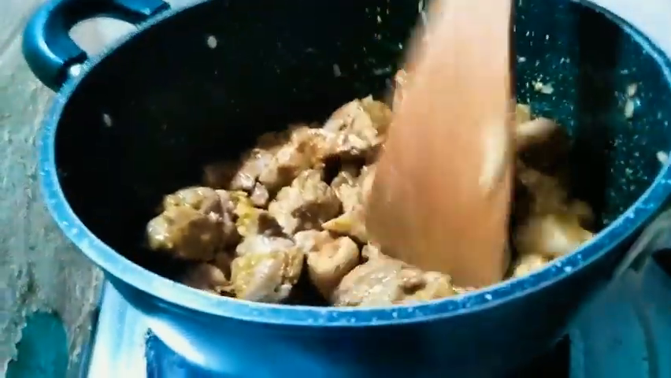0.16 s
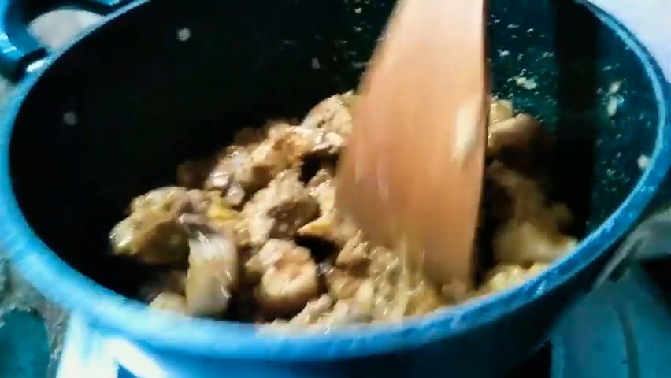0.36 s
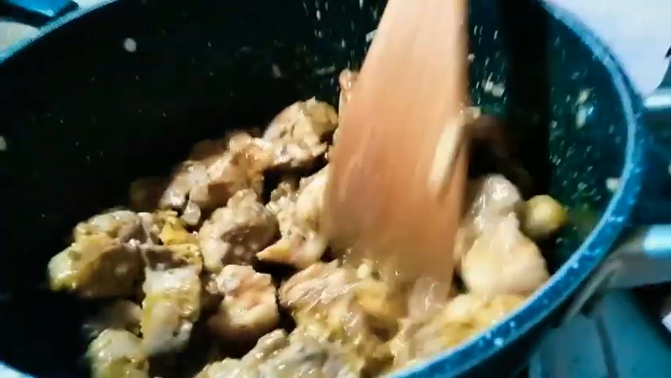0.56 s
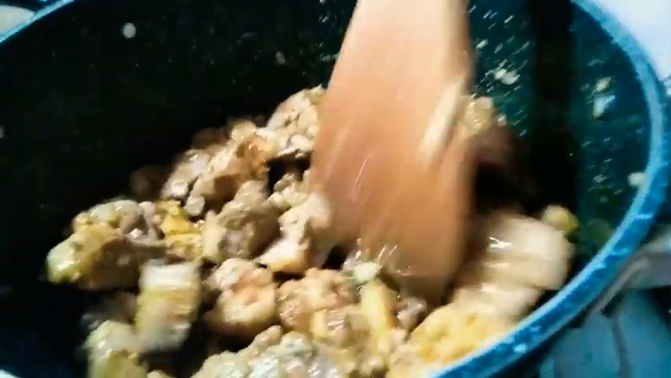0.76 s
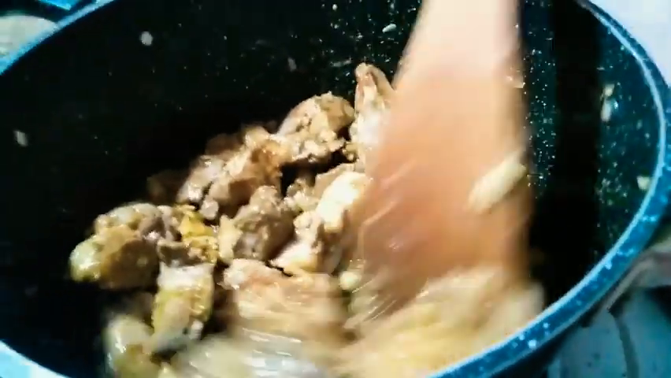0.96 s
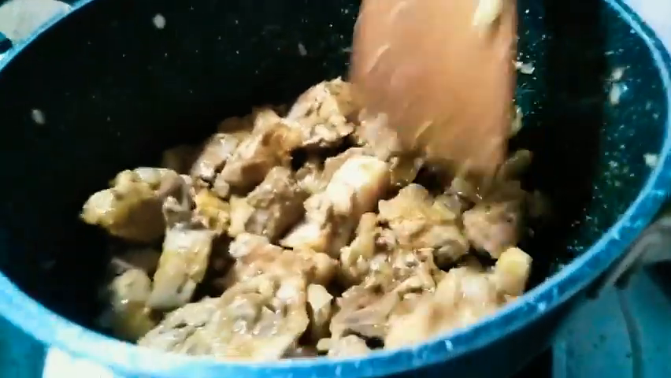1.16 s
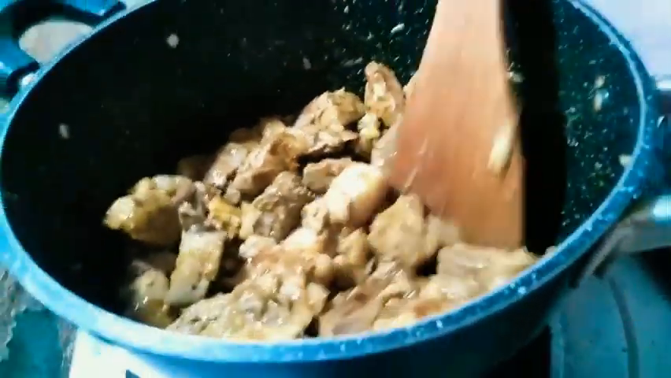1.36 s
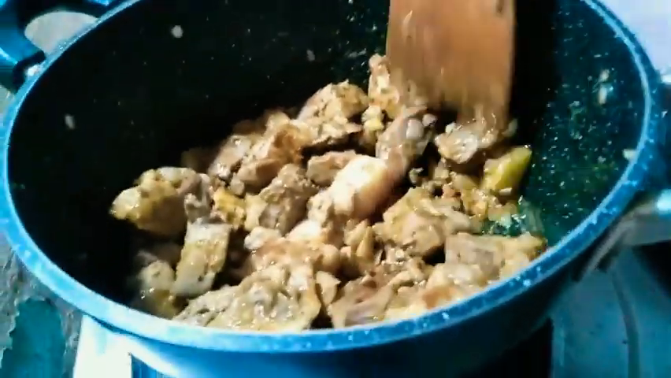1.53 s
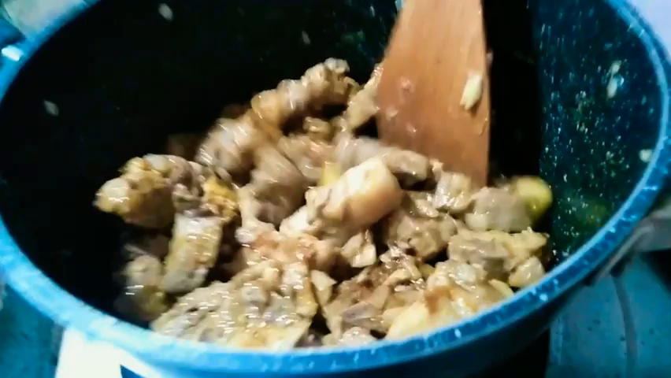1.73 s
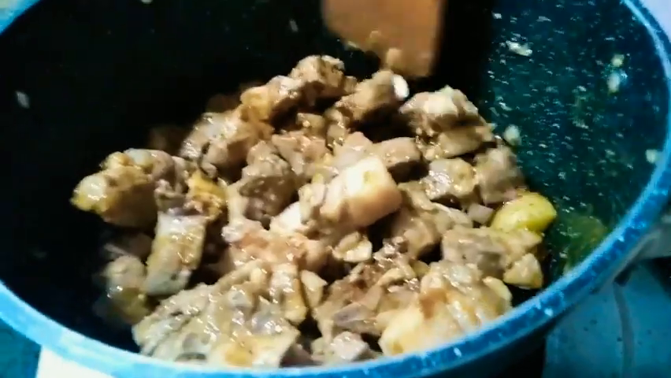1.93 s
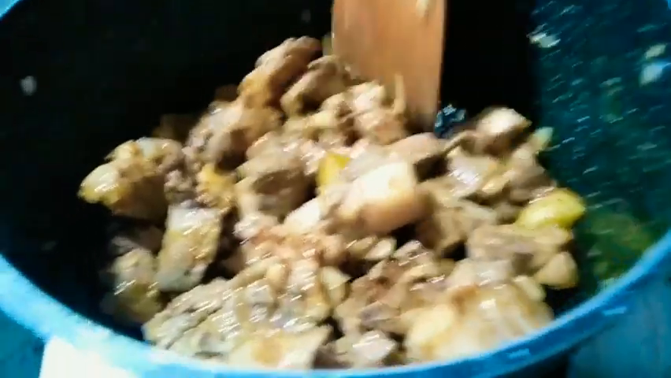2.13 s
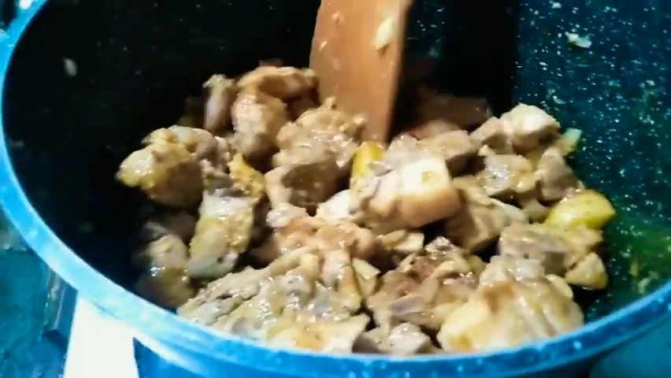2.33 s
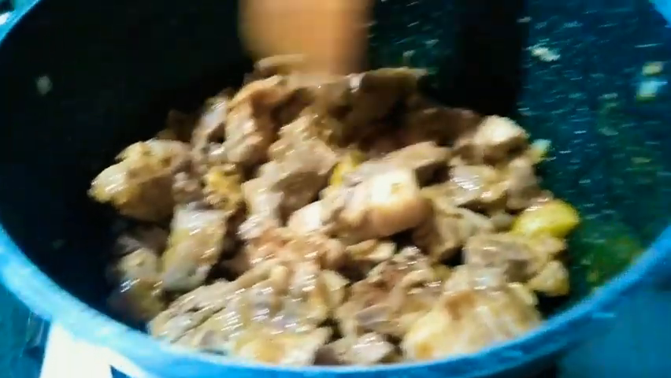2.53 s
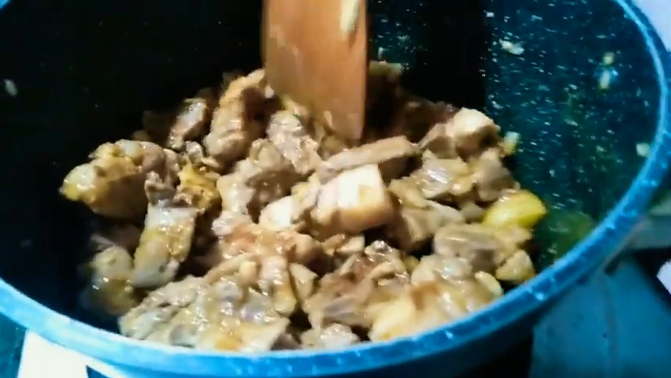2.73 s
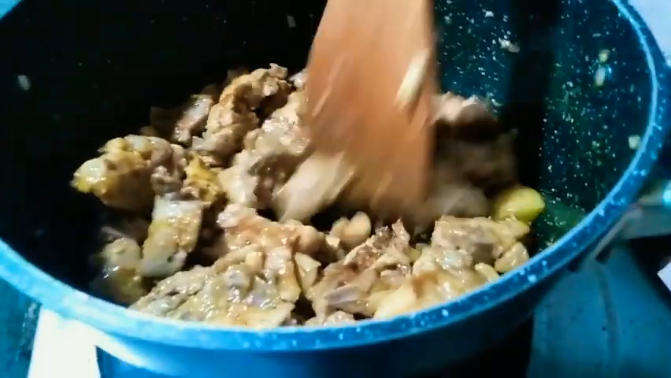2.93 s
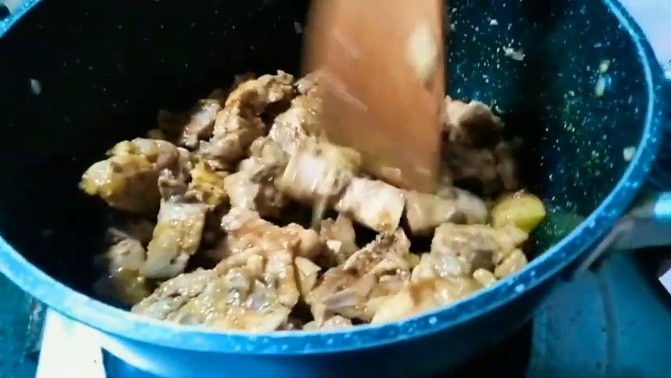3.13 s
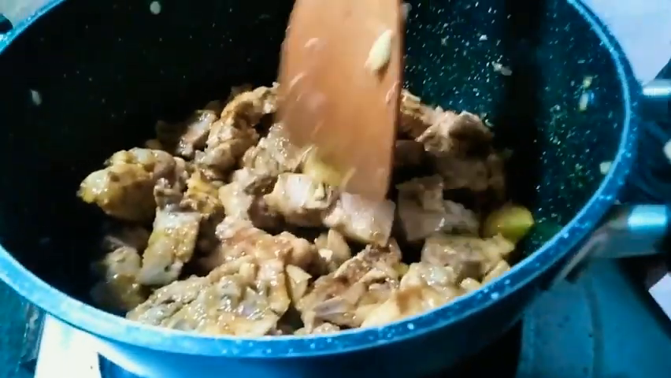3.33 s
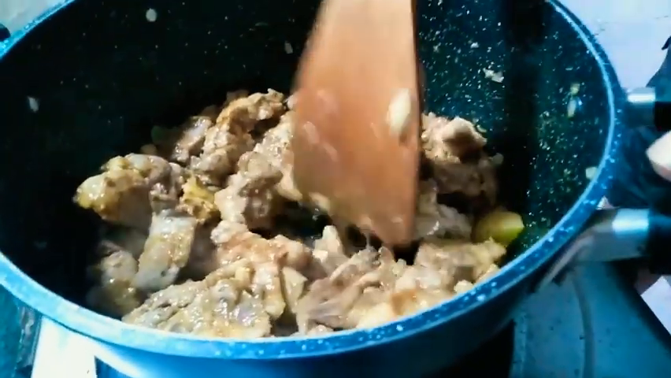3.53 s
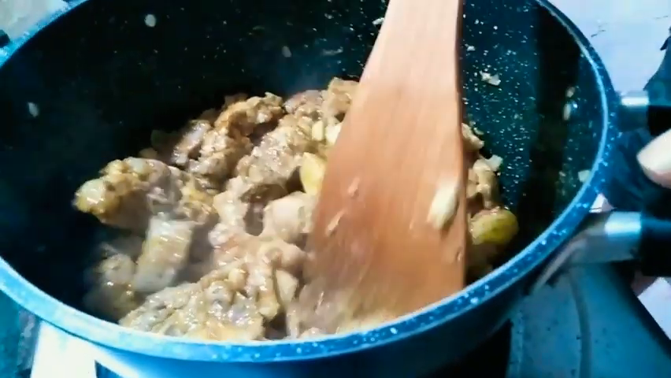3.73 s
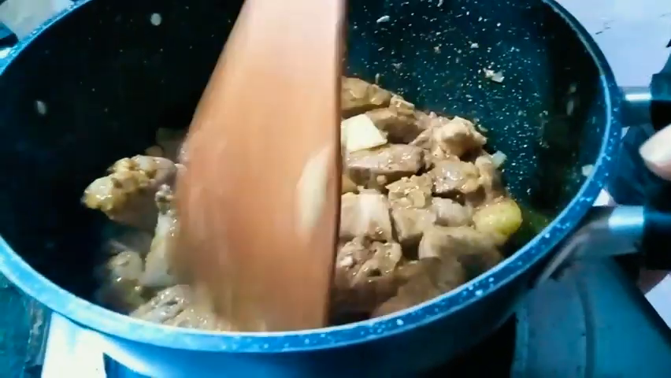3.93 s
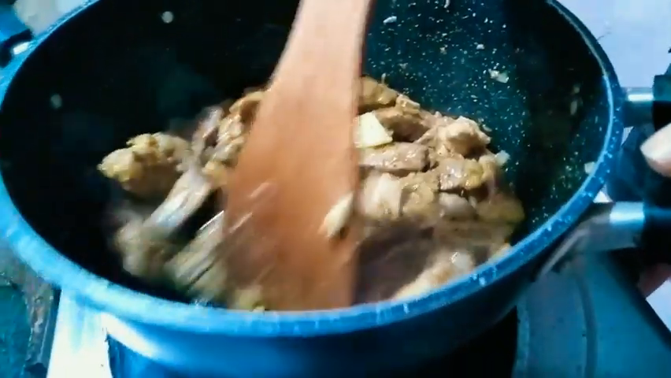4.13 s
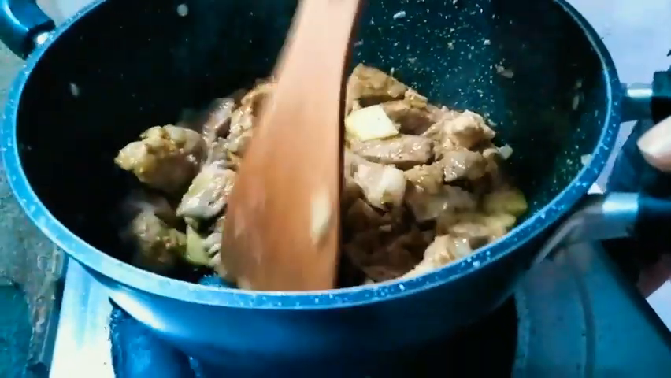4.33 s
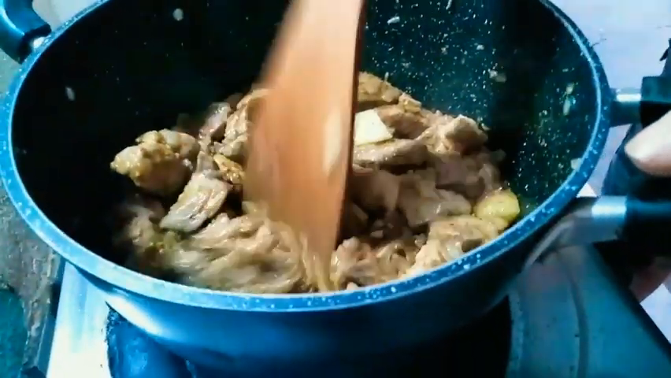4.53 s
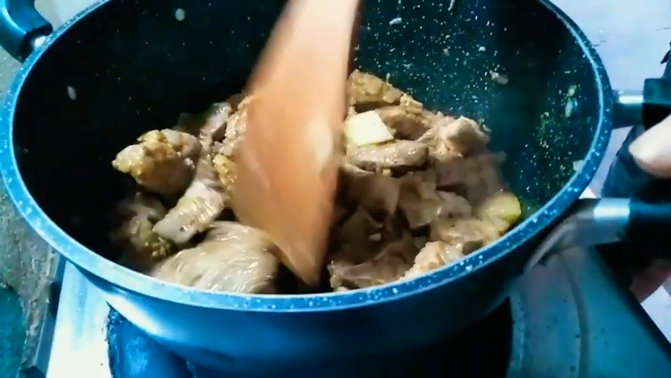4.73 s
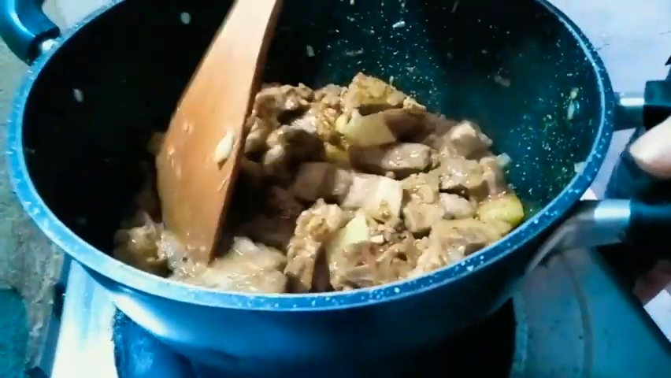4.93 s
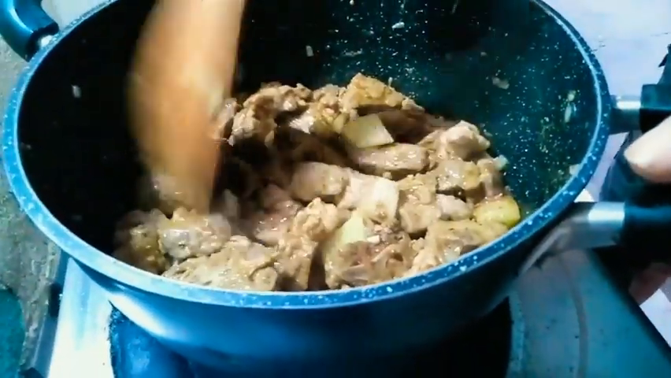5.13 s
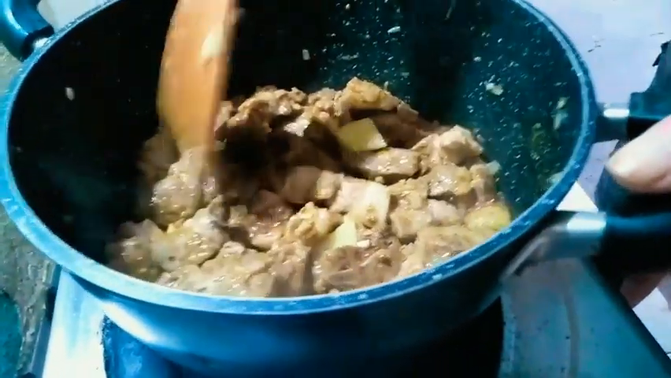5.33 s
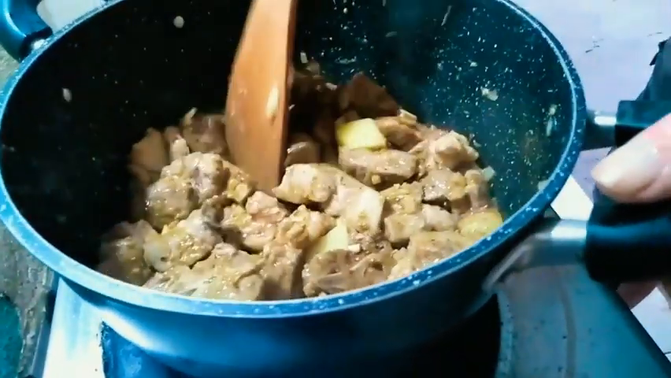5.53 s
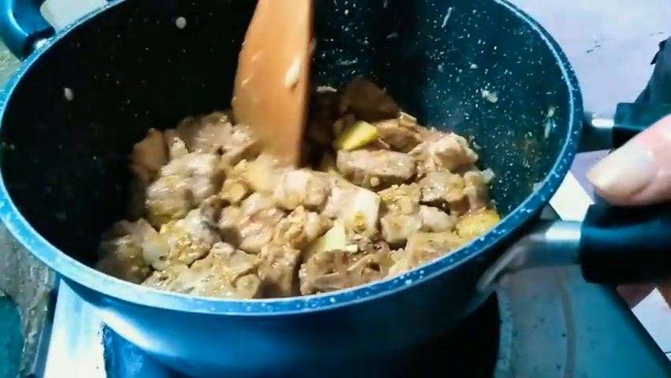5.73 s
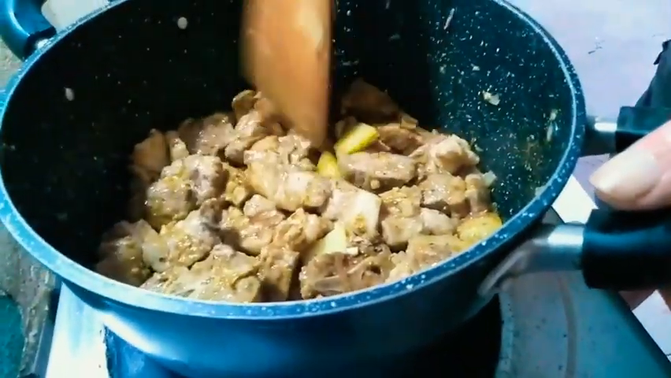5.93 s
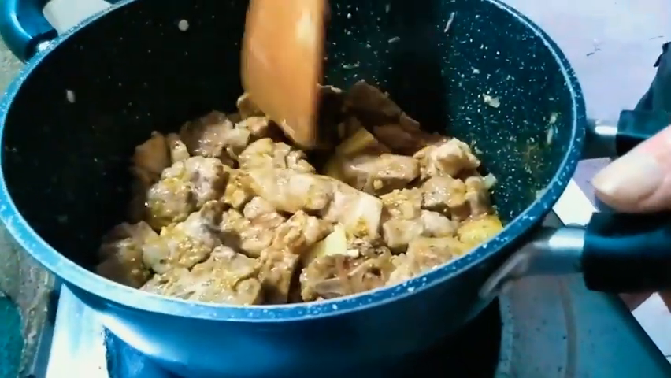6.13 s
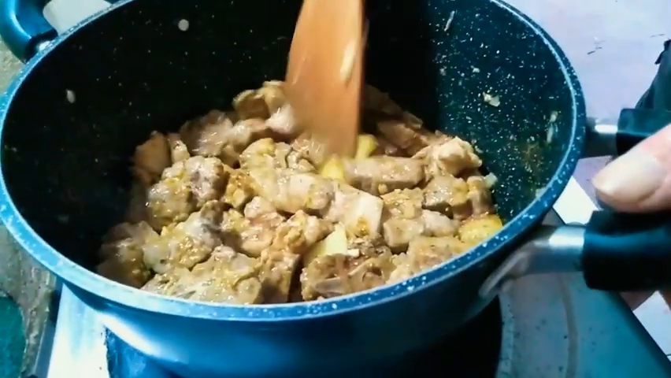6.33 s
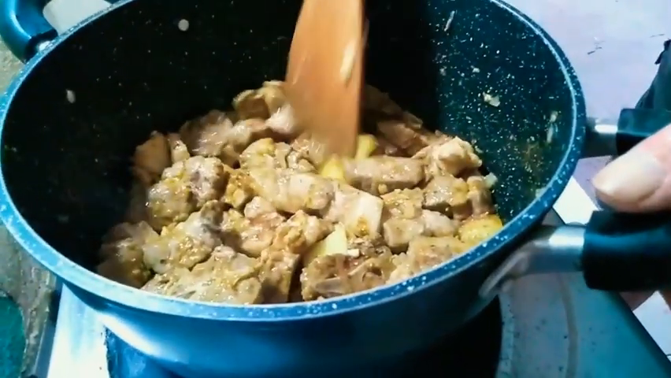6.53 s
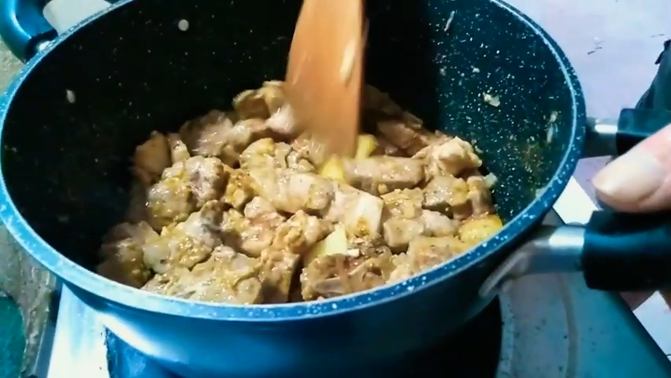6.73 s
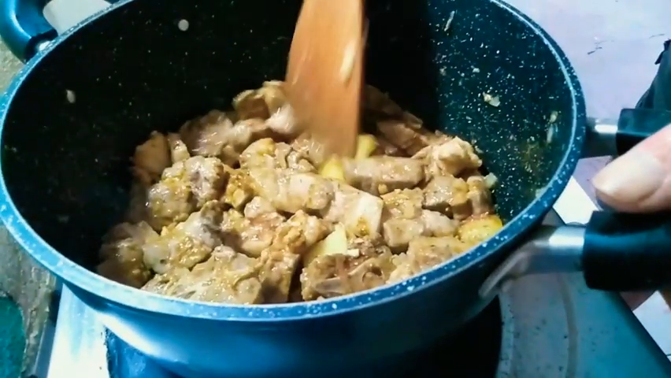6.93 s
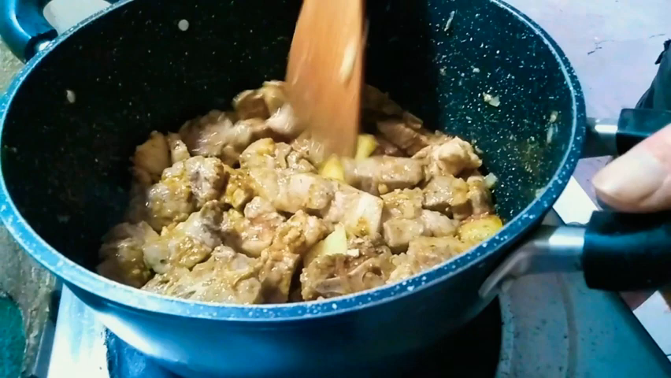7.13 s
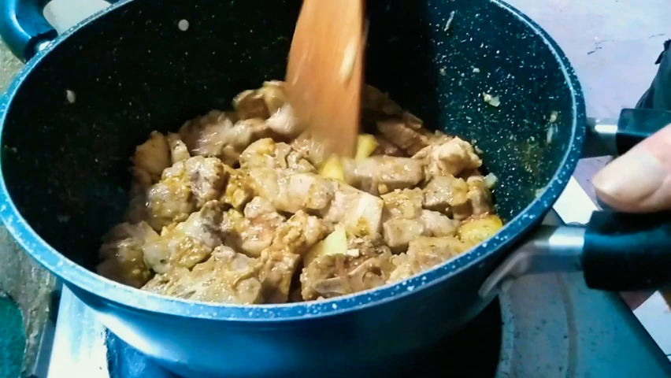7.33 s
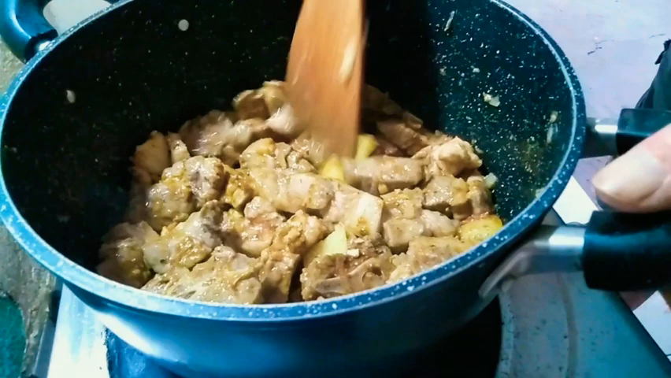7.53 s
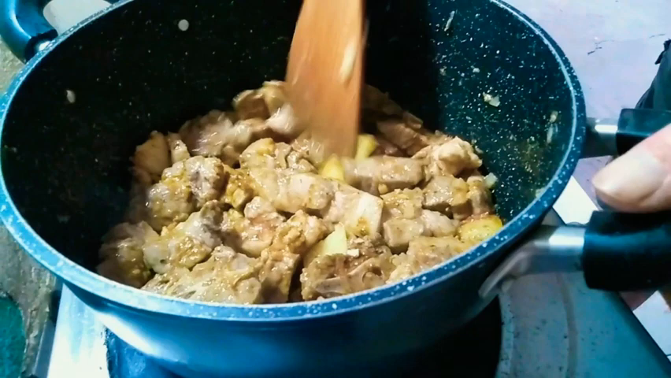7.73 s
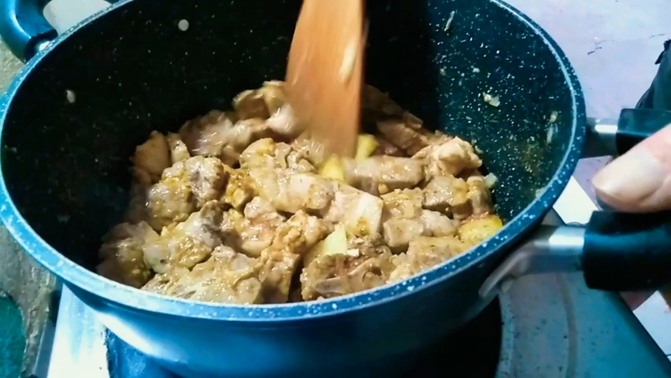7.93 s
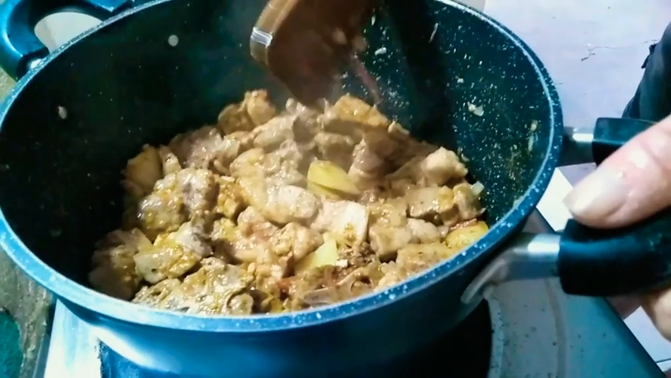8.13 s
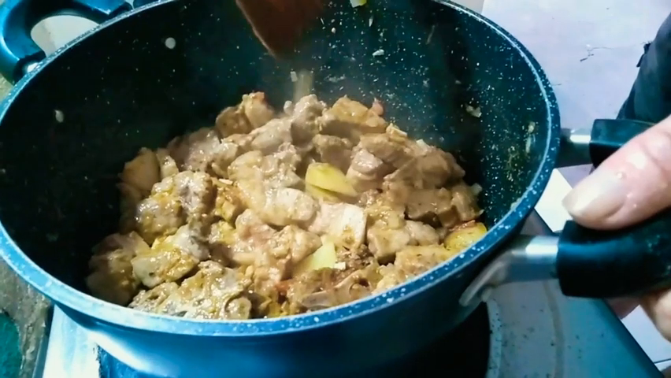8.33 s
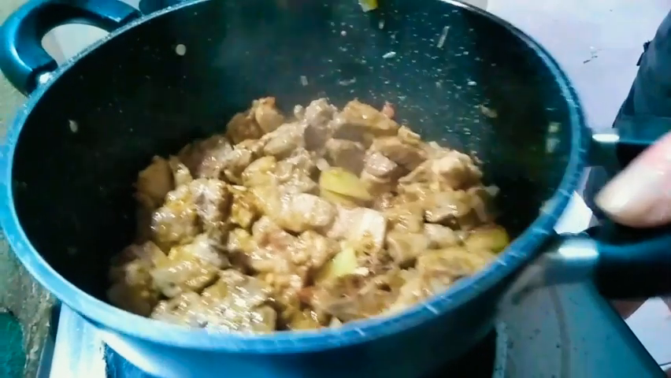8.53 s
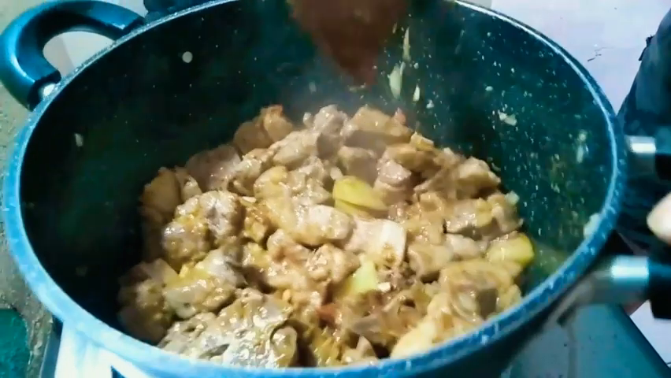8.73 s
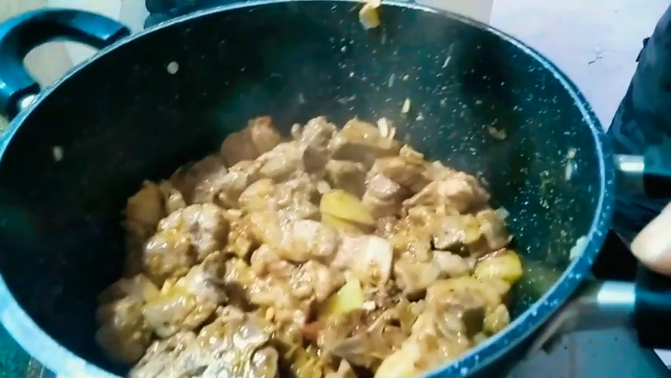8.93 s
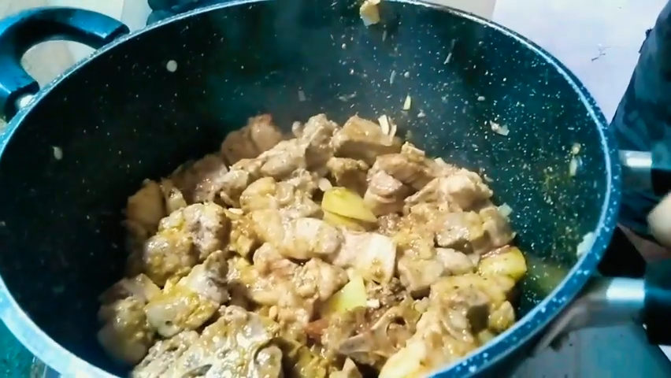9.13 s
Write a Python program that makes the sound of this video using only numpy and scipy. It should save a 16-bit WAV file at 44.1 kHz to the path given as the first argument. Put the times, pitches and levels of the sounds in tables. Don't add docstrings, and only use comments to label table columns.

```python
import sys
import numpy as np
from scipy import signal
from scipy.fft import rfft, irfft, next_fast_len
from scipy.io import wavfile
from scipy.ndimage import uniform_filter1d

SR = 44100
rng = np.random.default_rng(int(sys.argv[2]) if len(sys.argv) > 2 else 0)


def makeup_ratio(level_db):
    decades = np.asarray(level_db, float) / 20
    return 10 ** decades


def bounce(signal):
    frames = np.transpose(np.atleast_2d(signal))
    limited = np.clip(frames, -1, 1)
    pcm = np.round(limited * 32767).astype(np.int16)
    wavfile.write(sys.argv[1], SR, pcm)


N = 408366

# (frequency [Hz], density [dB per Hz])
SPRAY_SPECTRUM = [(900, -8), (1940, 1), (3400, -6), (4200, -5), (5350, -9), (6880, -5), (8130, 4),
                  (9850, -6), (11800, -9), (13400, -6), (14500, -2), (15750, 5)]
# (frequency [Hz], density [dB per Hz])
CRACKLE_SPECTRUM = [(600, -25.5), (865, 12.5), (1010, -6.5), (1150, 9.5), (1500, 3.5), (1950, 8),
                    (2300, 4.5), (2700, 5.5), (3100, 3.5), (3600, -1), (4200, -4), (5000, -11.5)]
# (frequency [Hz], density [dB per Hz])
LOW_SPECTRUM = [(12, -54), (20, -2), (54, -6), (77, -14.5), (108, -22.5), (157, -9), (253, -22),
                (406, -12.5), (448, -13), (583, -7), (721, -8.5), (863, -19.5), (1000, -2), (1300, -50.5),
                (2200, -120)]
# (frequency [Hz], density [dB per Hz])
RIM_SPECTRUM = [(2500, -19), (3200, -15.5), (4350, -7.5), (5910, -12), (7560, -4), (8230, -0.5),
                (11400, -15), (14000, -15), (15700, -3.5)]

# (frequency [Hz], level [dB], decay t60 [s])
POT_MODES = [(148.6, -6.5, 0.84), (226, -1, 0.13), (350, 13.5, 0.083), (418.8, 2.5, 0.31), (488, 0, 0.22),
             (542.9, -3.5, 0.51), (608, 3, 0.23), (688, 14.5, 0.14), (806, 14, 0.16), (894, 7, 0.28)]
# (frequency [Hz], level [dB], decay t60 [s])
BLADE_MODES = [(1096, 6, 0.026), (1314, 3, 0.034), (1621, 13.5, 0.013), (1878, 14, 0.0092),
               (2150, -6, 0.12), (2440, 0, 0.031)]
# (frequency [Hz], decay t60 [s])
KITCHEN_DECAY = [(100, 0.033), (600, 0.19), (2000, 0.2), (8000, 0.034), (15000, 0.017)]
# (frequency [Hz], decay t60 [s])
SCATTER_DECAY = [(100, 0.17), (330, 0.45), (520, 0.34), (850, 0.48), (2000, 0.19), (3000, 0.23)]

# (time [s], level [dB])
HEAT = [
    (0, 2.5),
    (1.6, 0.5),
    (2.4, 1.1),
    (4.4, 1),
    (5.9, -1.3),
    (7.0, 0),
    (7.9, -1.2),
    (9.26, -2.5),
]
# (time [s], level [dB])
LEAN = [(0, 0.5), (.44, 2.5), (.74, 0.5), (1.03, 2), (1.75, 0), (3.8, 1.3), (4.18, 5), (4.8, 0), (5.44, 3),
        (5.8, -1.5), (6.6, 1), (6.8, 0), (7.17, 3.5), (8.0, -1.5), (8.2, 6.5), (8.46, 2), (8.85, 5.5),
        (9.26, -3.5)]
# (time [s], flare [dB])
STROKES = [(.25, 4.3), (.6, 4.5), (.99, 4.7), (1.29, 1.8), (1.66, 3), (2.07, 2.5), (2.33, 6.5), (2.64, 4.5),
           (2.97, 3), (3.19, 1.7), (3.49, 1.6), (3.75, 2.2), (4.09, 1.5), (4.61, 4), (4.93, 4), (5.2, 5),
           (5.47, 4), (5.72, 5.2), (6.03, 3.3), (6.26, 4), (6.53, 3.5), (6.88, 3.5), (7.18, 4), (7.42, 1),
           (9.0, 1.2)]
# (time [s], peak [dB])
SPITS = [(.057, -24), (.225, -36), (.582, -32), (1.28, -24), (1.61, -41), (1.828, -30), (2.053, -30),
         (2.2777, -41), (2.69, -33), (2.942, -37), (3.469, -28), (3.74, -30), (4.039, -25), (4.27, -29),
         (5.021, -29), (5.176, -28), (5.412, -24), (5.73, -34), (6.413, -24), (6.462, -25), (6.494, -27.5),
         (6.543, -23), (6.5924, -27), (6.706, -27), (6.866, -33), (7.1272, -38), (7.582, -36), (7.619, -25),
         (7.8, -27), (8.348, -34)]
# (time [s], peak [dB], thump [dB], body [Hz])
SHOVES = [(.47, -44, 0, 455), (1.295, -42, 3, 424), (1.335, -33.5, -12, 515), (1.369, -40, -17, 700),
          (4.02, -41.5, -9, 580), (4.088, -38, -1, 670), (4.169, -41, -3, 603), (4.21, -37.5, -7, 610),
          (7.624, -43, -12, 560)]
# (time [s], peak [dB], hardness [dB], thump [dB], body [Hz])
BOUNCES = [
    (1.022, -34, -9, -17, 1190),
    (8.346, -31, -8, -35, 1720),
    (8.505, -32.5, -23, -11, 330),
    (8.672, -29, -3, -20, 594),
    (8.738, -19, -4, -16, 790),
]
# (start [s], length [s], level [dB])
RUBS = [
    (1.288, 0.11, -48),
    (4.06, 0.28, -55),
    (5.404, 0.051, -49.5),
    (7.097, 0.074, -56),
    (8.79, 0.16, -50.5),
    (8.46, .08, -48),
]
# (time [s], peak [dB], hardness [dB], ring factor [ratio], body [Hz])
STABS = [
    (1.683, -10, -1.5, 0.68, 553),
    (3.468, -16, -9, 0.57, 537),
    (4.618, -20.5, -19, 0.67, 504),
    (5.472, -18.5, -14, .65, 593),
]
# (time [s], peak [dB], body [Hz])
TICKS = [(2.064, -30.5, 710), (2.315, -33, 704), (2.635, -40, 690), (2.9, -31.5, 710), (3.728, -30.5, 670),
         (4.912, -34.5, 700), (5.409, -37, 690), (7.126, -33, 570), (7.17, -38, 616), (7.38, -30, 453)]
# (time [s], peak [dB])
RAPS = [
    (8.115, -11),
    (8.39, -10),
    (8.69, -9.3),
]
# (time [s], peak [dB])
SETTLES = [
    (8.799, -38),
    (8.879, -44),
]
# (time [s], low edge [Hz], high edge [Hz])
CHANNEL_SPLITS = [(1.99, 4200, 5300), (1.99, 13600, 15800), (2.18, 10300, 12500), (4.33, 5000, 7000),
                  (4.33, 12400, 14600), (4.54, 9600, 11100), (4.73, 5600, 8400), (5.94, 7500, 9800),
                  (7.31, 5000, 6400), (7.31, 10300, 11800), (8.395, 4200, 15800), (8.7, 4700, 15800)]

RUMBLE_DB, FIZZ_DB, CRACKLE_DB, SLOSH_DB, ROCK_DB = -57.5, -37.5, -47, -55.5, -61.5
SPLIT_HZ = 4700
FLARE_S = 0.048
SPIT_S = 0.013
DUCK_FROM_DB, DUCK_SHARE, RECOVER_DB_PER_S = -37.5, 0.26, 50
EDGE_HZ = 15770


def evened(x):
    return x / np.sqrt(np.mean(x ** 2) + 1e-20)


def read(points, hz):
    f, value = np.transpose(points)
    return np.interp(np.log(hz + 1), np.log(f + 1), value)


def add(mix, s, sound):
    part = mix[round(s * SR):][:len(sound)]
    part += sound[:len(part)]


def coloured(x, points, lo_hz=0, hi_hz=SR):
    hz = abs(np.fft.fftfreq(8192, 1 / SR))
    cut = 1 / np.sqrt((1 + (lo_hz / (hz + 1)) ** 8) * (1 + (hz / hi_hz) ** 8))
    log_gain = np.log(makeup_ratio(read(points, hz)) * cut + 1e-5)
    taps = np.fft.ifft(np.exp(np.conj(signal.hilbert(log_gain)))).real[:4096]
    return signal.oaconvolve(x, taps)[:len(x)]


def wander(top_hz):
    z = rfft(rng.standard_normal(next_fast_len(N)))
    hz = np.arange(len(z)) * SR / 2 / len(z)
    return evened(irfft(z * (hz > 1) / (1 + (hz / top_hz) ** 2))[:N])


def rumble():
    noise = evened(coloured(rng.standard_normal(N), LOW_SPECTRUM, lo_hz=30.2, hi_hz=105))
    return makeup_ratio(RUMBLE_DB + 0.72 * wander(5.6)) * noise


def bubbles(per_s, spread_db):
    size = makeup_ratio(spread_db * np.minimum(rng.exponential(1, N), 4)) * rng.standard_normal(N)
    return evened(size * (rng.random(N) < per_s / SR))


def patchy(x, depth_db):
    z = signal.stft(x, nperseg=512)[2]
    patches = uniform_filter1d(rng.standard_normal(z.shape), size=3, axis=0)
    patches = uniform_filter1d(patches, size=5, axis=1)
    return signal.istft(z * makeup_ratio(depth_db * evened(patches)), nperseg=512)[1][:N]


def spitting():
    swarm = np.zeros(N)
    t = np.arange(0, .15, 1 / SR)
    for s, db in SPITS:
        add(swarm, s, makeup_ratio(db - 6.0) * np.exp(-t / SPIT_S) * (1 - np.exp(-t / 0.0029)))
    return swarm * evened(coloured(bubbles(9900, spread_db=5.5), SPRAY_SPECTRUM, lo_hz=890))


def frying():
    t = np.arange(N) / SR
    heat = np.interp(t, *np.transpose(HEAT))
    lean = np.interp(t, *np.transpose(LEAN))
    coarse = t[::64]
    flare = np.interp(t, coarse, sum(db * np.exp(-.5 * ((coarse - s) / FLARE_S) ** 2) for s, db in STROKES))
    fizz_db = FIZZ_DB + 1.1 * heat + 0.52 * flare
    crackle_db = CRACKLE_DB + 0.56 * heat + 0.65 * flare
    slosh_db = SLOSH_DB + 0.49 * heat + 0.44 * flare + 0.067 * lean
    rock_db = ROCK_DB + lean
    gust_db = 0.51 * wander(10) + 0.46 * wander(160)
    blur = makeup_ratio(uniform_filter1d(gust_db, size=900))

    pops = bubbles(6000, spread_db=1.0) * makeup_ratio(gust_db) + makeup_ratio(2.5) * blur * rng.standard_normal(N)
    own = [makeup_ratio(0.11 * wander(2.9)) for _ in range(4)]
    fizz = evened(coloured(patchy(pops, depth_db=1.6), SPRAY_SPECTRUM, lo_hz=SPLIT_HZ))
    juice = evened(patchy(pops, depth_db=1.33))
    crackle = evened(coloured(juice, CRACKLE_SPECTRUM, lo_hz=1000, hi_hz=SPLIT_HZ))

    wet = bubbles(1500, spread_db=1.0) * makeup_ratio(0.44 * gust_db) + makeup_ratio(-0.5) * blur * rng.standard_normal(N)
    slosh = evened(coloured(evened(wet) + 1.13 * juice, LOW_SPECTRUM, lo_hz=330, hi_hz=945))
    rock = evened(coloured(wet, LOW_SPECTRUM, lo_hz=117, hi_hz=340))
    bright = makeup_ratio(fizz_db) * own[0] * fizz + makeup_ratio(crackle_db) * own[1] * crackle
    deep = makeup_ratio(slosh_db) * own[2] * slosh + makeup_ratio(rock_db) * own[3] * rock
    return bright + deep + spitting()


def rung(t, hz, db, t60):
    return (makeup_ratio(db - 60 * t[:, None] / t60) * np.sin(2 * np.pi * np.outer(t, hz))).sum(1)


def knock(db, hard_db, thump_db, ring, body_hz, pot_db=0, scatter_db=0):
    t = np.arange(0, .4, 1 / SR)
    hz, mode_db, t60 = np.transpose(BLADE_MODES)
    blade_db = mode_db + hard_db * hz / 1700 - 13
    blade = rung(t, hz * (1 + 0.032 * rng.standard_normal(len(hz))), blade_db, np.minimum(t60, .04))
    spot = rung(t, np.array([1, 1.4, 1.9]) * body_hz, np.array([0, -8, .3 * hard_db - 12]), .022)
    contact = (blade + spot) * (1 - np.exp(-t / .0004))
    pulse = coloured(contact, [(0, 0), (SR, 0)], lo_hz=.75 * min(body_hz, 600), hi_hz=2900)
    thump = rung(t, [95, 140, 240], thump_db + np.array([-8, .1, 1.5]), np.array([.08, .05, .04]))
    pulse = pulse + thump * (1 - np.exp(-t / 0.0025))

    hz, mode_db, t60 = np.transpose(POT_MODES)
    near_db = read([(150, thump_db + 8), (300, thump_db), (.75 * body_hz, -5), (body_hz, 0),
                    (1.6 * body_hz, -14)], hz)
    pot_hz = hz * (1 + 0.0055 * rng.standard_normal(len(hz)))
    pot = rung(t, pot_hz, mode_db + near_db + pot_db - 22.0, t60 * ring)

    f, frame_s, z = signal.stft(rng.standard_normal(len(t)), SR, nperseg=256)
    decay = makeup_ratio(-60 * frame_s / (ring * read(SCATTER_DECAY, f))[:, None])
    scatter = signal.istft(z * decay, SR, nperseg=256)[1][:len(t)] * (1 - np.exp(-t / 0.0059))
    echoes = makeup_ratio(scatter_db - 29.5) * signal.oaconvolve(pulse, scatter)[:len(t)]
    body = pulse + pot * (1 - np.exp(-t / 0.0058)) + echoes
    return -makeup_ratio(db) * body / abs(body).max()


def blows():
    rows = [(s, db, -4.5, thump_db, 1.3, hz) for s, db, thump_db, hz in SHOVES]
    rows += [(s, db, hard_db, thump_db, .7, hz) for s, db, hard_db, thump_db, hz in BOUNCES]
    rows += [(s, db, hard_db, -20, ring, hz, 3.5, -4.5) for s, db, hard_db, ring, hz in STABS]
    rows += [(s, db, 8.5, -18, 1.1, hz) for s, db, hz in TICKS]
    rows += [(s, db, -1.5, -14, .7, 622, -3.5, .6) for s, db in RAPS]
    rows += [(s, db, -14.5, -24, 2.5, 425, 9.5, -8) for s, db in SETTLES]
    mix = np.zeros(N)
    for s, *blow in rows:
        add(mix, s + 0.001926, knock(*blow))
    for s, db in RAPS:
        add(mix, s + .0015, clang(db - 8.0))
    return coloured(mix, [(0, 0), (SR, 0)], lo_hz=65)


def room(x):
    at = np.arange(120, SR // 2 - 20, 20)
    taps = np.zeros(SR // 2)
    taps[at + rng.integers(0, 20, len(at))] = rng.choice([-1., 1.], len(at))
    hz, t, z = signal.stft(taps, SR, nperseg=256)
    decay = makeup_ratio(-60 * t / read(KITCHEN_DECAY, hz)[:, None])
    tail = signal.istft(z * decay, SR, nperseg=256)[1]
    return signal.oaconvolve(x, tail / np.linalg.norm(tail))[:N]


def rubbing():
    stroke = np.zeros(N)
    for s, length, db in RUBS:
        add(stroke, s, makeup_ratio(db) * np.hanning(round(length * SR)) ** .5)
    return stroke * evened(coloured(bubbles(900, spread_db=2.5), LOW_SPECTRUM, lo_hz=290, hi_hz=836))


def clang(db):
    t = np.arange(0, .3, 1 / SR)
    shape = (np.exp(-t / 0.0031) + .5 * np.exp(-t / 0.027)) * (1 - np.exp(-t / 0.0017))
    shimmer = shape * evened(coloured(rng.standard_normal(len(t)), RIM_SPECTRUM, lo_hz=2500))
    return makeup_ratio(db + 3.5) * (shimmer + rung(t, [4270], -31.5, 0.31))


def scene():
    hits = blows()
    echo = makeup_ratio(-19) * room(hits)
    return np.tile(rumble() + frying() + hits + echo + rubbing(), (2, 1))


def ducked(x):
    treble = signal.sosfilt(signal.butter(2, 4000, "high", fs=SR, output="sos"), x[0])
    power_db = 10 * np.log10(abs(uniform_filter1d(treble ** 2, size=900)) + 1e-12)
    fall = np.arange(N) * RECOVER_DB_PER_S / SR
    held_db = np.maximum.accumulate(power_db + fall) - fall
    over_db = np.maximum(held_db - DUCK_FROM_DB, 0)
    lag = np.exp(-1 / (0.061 * SR))
    return x / makeup_ratio(DUCK_SHARE * signal.lfilter([1 - lag], [1, -lag], over_db))


def parted():
    """Empty and unused: channel_difference, below, sets the two channels apart."""


def channel_difference(heard_by_capsule):
    side, window = np.zeros(N), np.hanning(1500)
    for s, lo_hz, hi_hz in CHANNEL_SPLITS:
        band = signal.butter(12, [lo_hz, hi_hz], "band", fs=SR, output="sos")
        heard = signal.sosfilt(band, heard_by_capsule[round(s * SR) - 750:][:len(window)])
        level = np.sqrt(abs(uniform_filter1d(heard ** 2, size=200)))
        noise = evened(signal.sosfilt(band, rng.standard_normal(len(window))))
        add(side, s - 750 / SR, window * level * noise)
    return side


def top_cut(x):
    return signal.sosfilt(signal.butter(12, 17130, fs=SR, output="sos"), x)


def record(dry):
    dry = ducked(dry)
    side = channel_difference(dry[0])
    both = dry + makeup_ratio(-6.5) * np.array([side, -side])
    low_pass = signal.firwin(801, EDGE_HZ, window=("kaiser", 9), fs=SR)
    both = signal.oaconvolve(both, low_pass[None], "same")
    return top_cut(both)


dry = scene()
out = record(dry)
bounce(out)
```